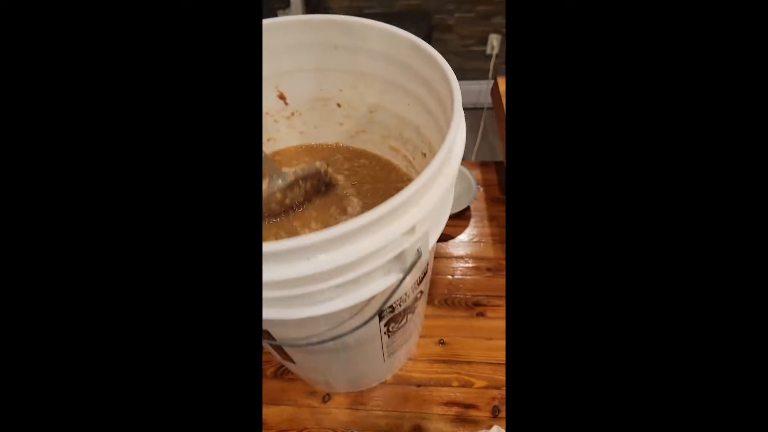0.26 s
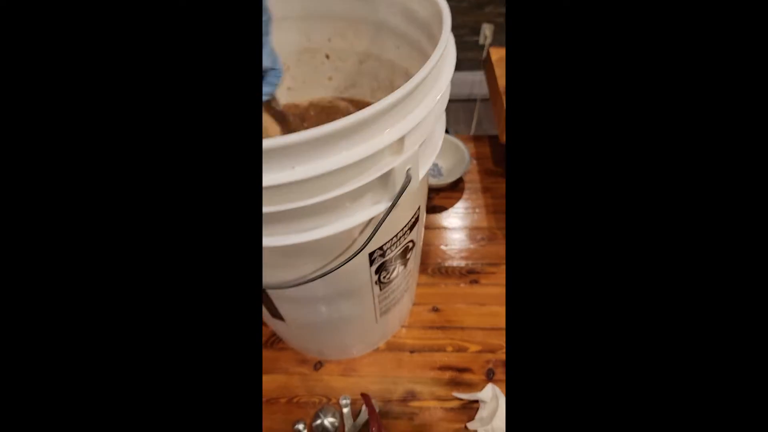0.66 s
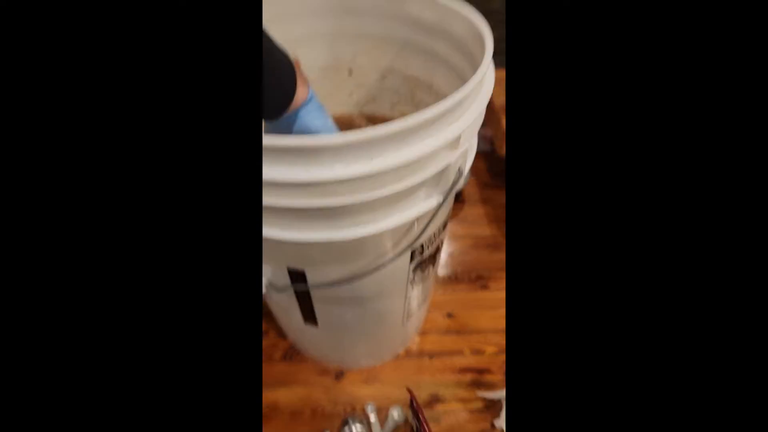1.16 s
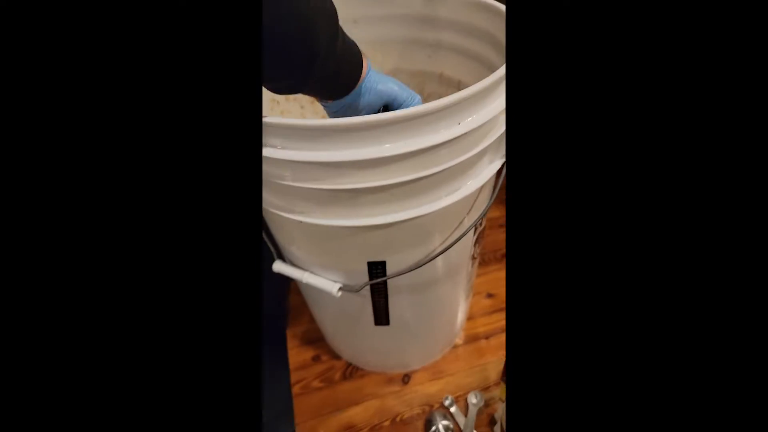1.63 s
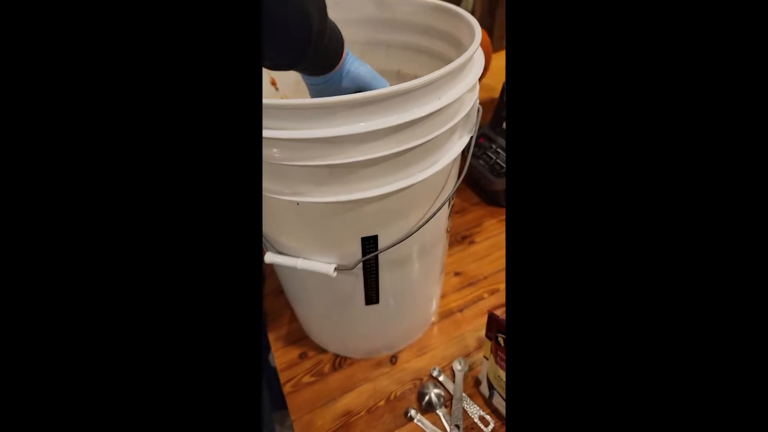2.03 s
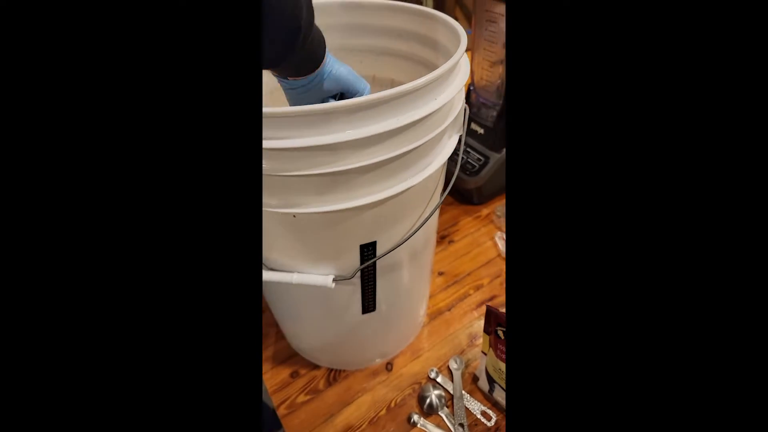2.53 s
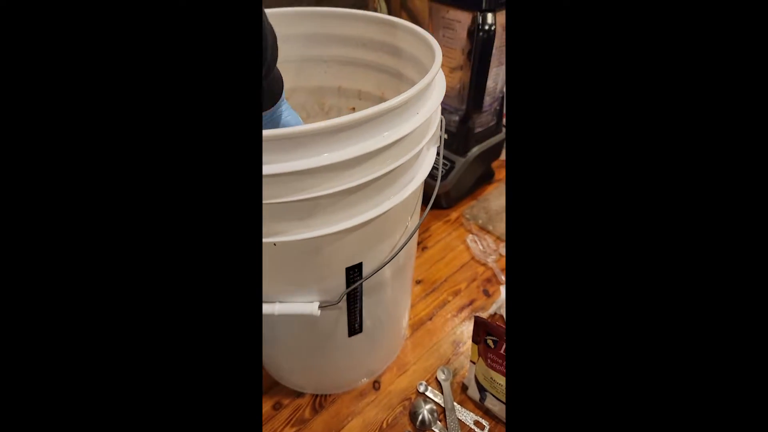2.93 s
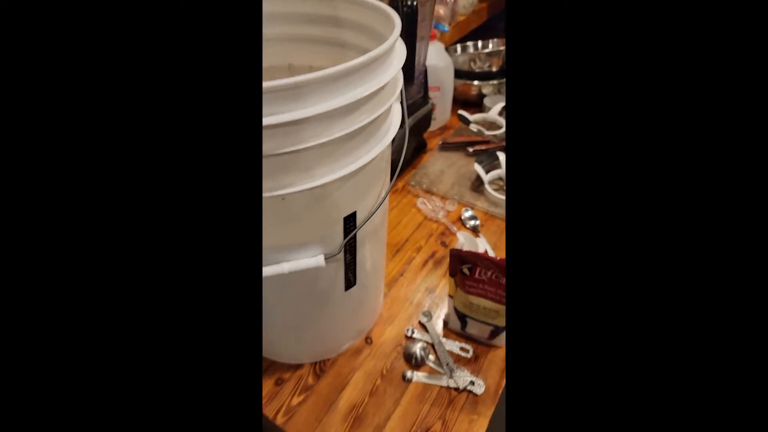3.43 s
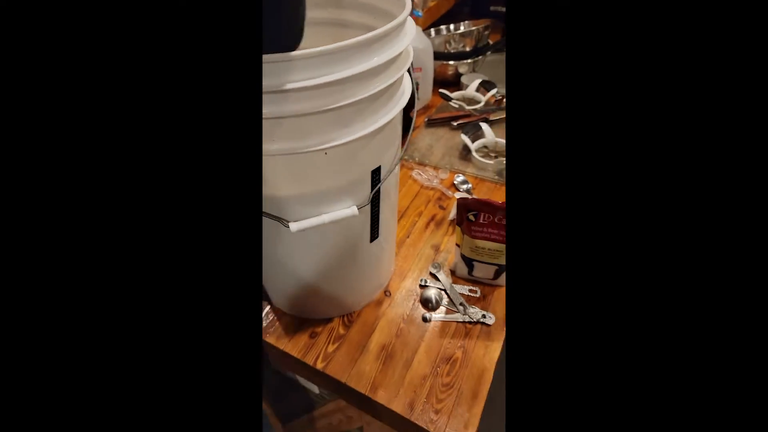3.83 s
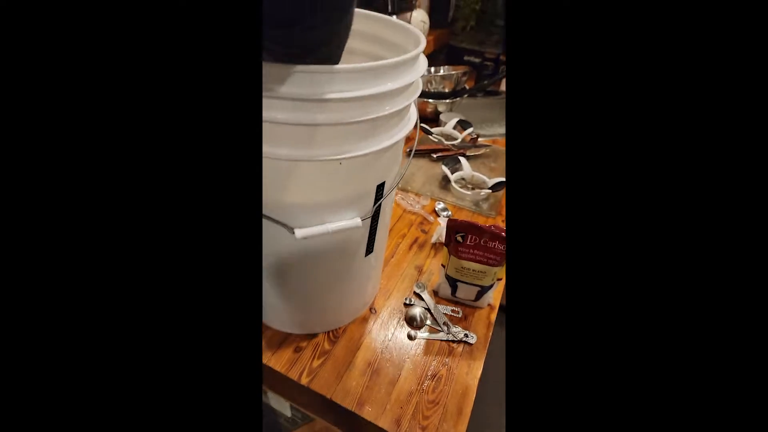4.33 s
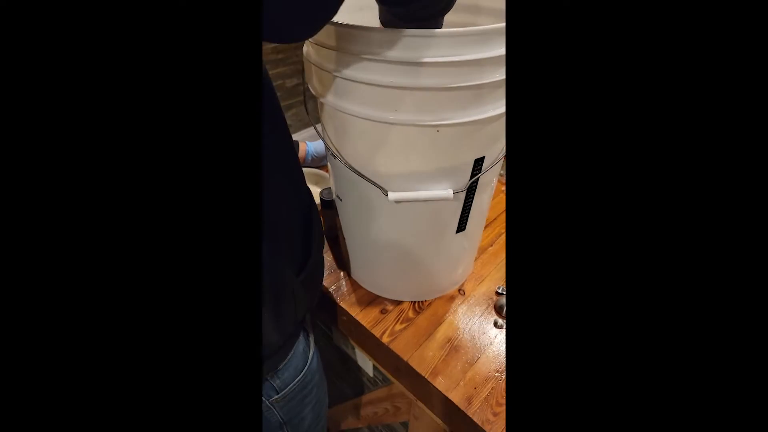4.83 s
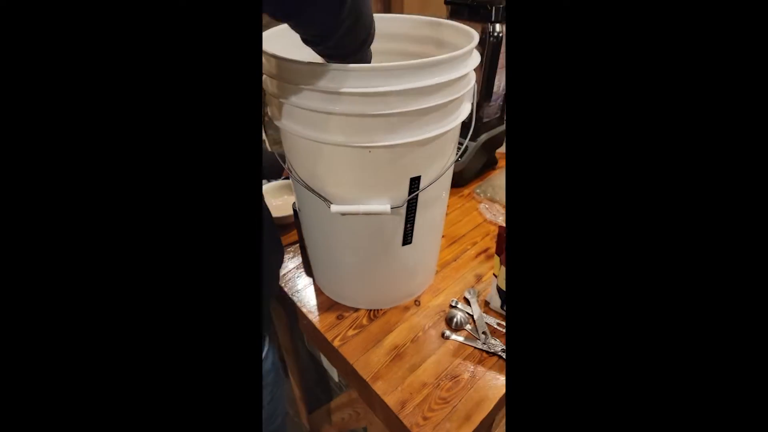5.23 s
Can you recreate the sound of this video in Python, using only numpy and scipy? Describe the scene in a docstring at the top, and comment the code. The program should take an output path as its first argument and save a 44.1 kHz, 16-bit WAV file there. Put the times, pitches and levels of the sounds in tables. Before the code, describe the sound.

Close, wide stereo sound of stirring in a large plastic bucket on a wooden kitchen table, with short room reflections and a faint constant hiss. From 0 to 0.6 s there are only very weak spoon taps and tiny hollow plops; a small knock and slap come at 0.65 s. From about 0.9 s the liquid begins to swell and gurgle, with a plop and splash at 1.1 s. The hardest hollow knock lands at 1.5 s, followed by a burst of slaps and scattered drops. A short easing, then strong knocks at 2.15 and 2.85 s, where a low thud starts the table rumbling. Between 3.1 and 3.7 s knocks crowd together with a big wet slap at 3.4 s. Softer knocks and short hollow tones follow around 4 s, then more sloshing, knocks near 4.8 and 5.15 s with low thuds at 4.85 and 5.3 s, still stirring at the end, 5.5 s.

```python
"""A kitchen, two microphones close to a plastic bucket on a wooden table; a faint hiss runs throughout.
It opens with weak spoon knocks, as struck modes, and short hollow tones, as decaying sines that rise a little.
From about 0.9 s waves swell: clicks through filters and resonators gurgle, slosh, slap the wall and spray.
The hardest knock comes at 1.5 s; knocks then go on unevenly, nearly five a second over the whole take.
From 2.9 s the table rumbles more readily, as filtered noise, until the stirring stops with the end at 5.5 s."""
import sys
import numpy as np
from scipy import signal
from scipy.fft import rfft, irfft, next_fast_len
from scipy.io import wavfile
from scipy.ndimage import uniform_filter1d

SR = 44100
rng = np.random.default_rng(int(sys.argv[2]) if len(sys.argv) > 2 else 0)


def store_pcm(level_fs):
    """Save levels as 16-bit WAV."""
    pcm = np.round(np.clip(level_fs, -1, 1) * 32767).astype(np.int16)
    wavfile.write(sys.argv[1], SR, np.atleast_2d(pcm).T)


N = 241263


def from_db(db):
    """Turn decibels into an amplitude factor."""
    return 10 ** (np.asarray(db) / 20)


def rms_one(x, count=None):
    """Scale to rms 1, taken over the first count samples."""
    return x / np.sqrt(np.mean(x[..., :count] ** 2) + 1e-20)


def at_hz(points, hz):
    """Read a table on a log-frequency axis."""
    f, value = np.transpose(points)
    return np.interp(np.log(np.maximum(hz, 1)), np.log(f), value)


def add(track, s, sound):
    """Mix a sound into the track at a time; one due before the start begins at the start."""
    i = max(0, round(s * SR))
    track[i:i + len(sound)] += sound[:max(0, N - i)]


def band(x, low, high):
    """Band-pass with fairly steep edges."""
    edges = [low, min(high, 0.45 * SR)]
    return signal.sosfilt(signal.butter(3, edges, "band", fs=SR, output="sos"), x)


def colour(x, spectrum):
    """Causal (minimum-phase) filter of unit power with the given spectrum, falling steeply past its ends."""
    size = 8192
    hz = np.maximum(np.arange(size // 2 + 1) * SR / size, 1)
    octaves_outside = np.abs(np.log2(hz / np.clip(hz, spectrum[0][0], spectrum[-1][0])))
    response_db = at_hz(spectrum, hz) - np.minimum(24 * octaves_outside, 50)
    cepstrum = irfft(np.log(rms_one(from_db(response_db))))
    # folding the cepstrum forward makes the filter causal
    cepstrum[1:size // 2] *= 2
    cepstrum[size // 2 + 1:] = 0
    return signal.oaconvolve(x, irfft(np.exp(rfft(cepstrum))))[:len(x)]


def drift(rate):
    """Smooth chance: normal values, rate of them a second, joined by straight lines."""
    knots = rng.standard_normal(int(N / SR * rate) + 2)
    return np.interp(np.arange(N) / SR * rate, np.arange(len(knots)), knots)


def ring(force, hz, t60):
    """A damped resonator: a unit click sets a sine of height 1 ringing."""
    r, w = from_db(-60 / (t60 * SR)), 2 * np.pi * hz / SR
    return signal.lfilter([0, np.sin(w)], [1, -2 * r * np.cos(w), r * r], force + 1e-18)


def grains(count, per_s, spread_db):
    """Random clicks of uneven size and either sign; rms 1."""
    clicks, number = np.zeros(count), max(1, int(per_s * count / SR))
    place, size, sign = np.random.default_rng(rng.integers(2 ** 31)).random((number, 3)).T
    height = from_db(spread_db * np.minimum(-np.log(1 - size), 4))
    clicks[(place * count).astype(int)] = np.sign(sign - 0.5) * height
    return rms_one(clicks)


def rising_tone(hz, cycles, rise):
    """A sine that dies by 60 dB over some cycles while its pitch rises by the given share."""
    age = np.arange(int(cycles / hz * SR)) / (cycles / hz * SR)
    tone = np.sin(2 * np.pi * cycles * (age + rise * age ** 2 / 2))
    return tone * from_db(-60 * age) * (1 - np.exp(-age * cycles))


# spectrum of the kitchen's hiss at the microphones: (frequency [Hz], relative level [dB])
HISS_SPECTRUM = [(25, 3), (60, 2), (110, -9.5), (200, -13.5), (345, 3), (480, -7), (620, -7.5), (780, -5.5),
                 (1100, -13), (1600, -12.5), (2150, -6.5), (2800, -16), (3600, -13.5), (4500, -10.5),
                 (5600, -17.5), (7200, -15), (9500, -29.5), (13000, -24), (16000, -24)]


def background(hiss_db=-64):
    """The steady faint hiss of the kitchen, as coloured noise."""
    return from_db(hiss_db) * colour(rng.standard_normal(N), HISS_SPECTRUM)


# spoon knocks on the bucket wall: (time [s], strength [dB], hollow ring of that spot [dB],
# brightness [dB], hardness of the contact [dB])
KNOCKS = [(0.001, -65.5, 16.5, 13, 13), (0.204, -62.5, 4, 15, 12), (0.648, -48.5, 1, -5, 12),
          (1.096, -36.5, 2.5, -7, -5), (1.179, -43, 6, -3, -2), (1.222, -39, 1.5, 2, -5),
          (1.538, -18.5, 1, 1, 0), (1.809, -40, -6.5, 4.5, -10), (1.884, -46, 6, -1, 4),
          (2.142, -22.5, -3.5, 3, 2), (2.342, -31, 0, 4, -3), (2.665, -35.5, 3, 7, 0),
          (2.858, -26.5, 0, 2, 1), (3.132, -21, 2.5, 3, 4), (3.319, -22, -4, -3.5, 15.5),
          (3.401, -24, -5.5, -1, -8), (3.647, -25, 0, -6.5, 7.5), (3.823, -34.5, -3, -7, 19),
          (3.949, -34.5, -5, 9, -14.5), (4.08, -42, -10, -7, -10), (4.243, -28, -4, -15, 1),
          (4.42, -37, -6.5, 3.5, -2), (4.524, -36.5, -6, -6, -5), (4.817, -24, -1, -6.5, 2),
          (5.139, -29.5, 1.5, -15, 3), (5.45, -27.5, -6, -2, 0)]
# spectrum of sloshing liquid: (frequency [Hz], relative level [dB])
SLOSH_SPECTRUM = [(550, -14), (800, 3.5), (1050, 2.5), (1400, 7), (1800, -2), (2150, -3.5), (2700, -9),
                  (4000, -22), (6000, -32)]


def grazes(level_db=-15.5, lead_s=0.0059):
    """The spoon squeezes the liquid against the wall: a hiss growing up to each knock."""
    out, t = np.zeros(N), np.arange(-SR // 30, 0) / SR
    for s, strength_db, *_ in KNOCKS:
        swell = rng.standard_normal(len(t)) * np.exp(t / lead_s)
        add(out, s + t[0], from_db(strength_db + level_db) * swell)
    return colour(out, SLOSH_SPECTRUM)


# wall and air-column modes of the bucket: (frequency [Hz], relative level [dB], t60 [s])
BUCKET_MODES = [(192, -14.5, 0.091), (268.5, -3, 0.17), (300.6, -7.5, 0.15), (330.5, -1, 0.18),
                (360.6, -0.5, 0.16), (393, -3, 0.093), (456.5, -11.5, 0.27), (742.7, 0.5, 0.16),
                (786.2, 1.5, 0.19), (867, -5, 0.3), (930.5, -2.5, 0.16), (1261, -3, 0.068),
                (1354.4, 0.5, 0.05), (1434, -6.5, 0.2), (1510, -27, 0.042), (2060, 9.5, 0.18),
                (2240, -15, .09), (2877, -4, 0.23), (3566, -0.5, 0.028), (3960, -33.5, 0.07)]
# the four registers of a knock: (low edge [Hz], high edge [Hz], level [dB], build-up [s],
# dense ring t60 [s], dense ring level [dB], crack level [dB], crack length [s])
REGISTERS = [(139.5, 585, 1, 0.0052, 0.23, -6, -1, 0.024), (530, 1347, 0, 0.0018, 0.15, -8, 9, 0.011),
             (1097, 1696, -1, 0.0011, 0.24, -1, 9.5, 0.0022),
             (1760, 4370, -8.5, 0.00072, 0.15, -5, 11, 0.00074)]
# what a knock gives each register: (level [dB], hollow ring [share], brightness [share], hardness [share])
VOICING = [(0.0, 0.032, 0.0, 0.0), (-0.5, 0.96, 0.029, 0.0), (-3, 0, 0.5, 0.26), (-9.0, 0.29, 0.91, 0.0)]


def knocks(chatter_db=-25.0, chatter_s=0.0098, uneven_db=3.0, push_db=0.0, push_hz=394.0):
    """The spoon cracks on the wall and chatters; each spot favours other modes, over a dense plastic ring."""
    out, t = np.zeros(N), np.arange(SR // 3) / SR
    for s, strength_db, hollow_db, bright_db, hard_db in KNOCKS:
        chatter = grains(len(t), per_s=680, spread_db=1.5) * np.exp(-t / chatter_s)
        force = from_db(chatter_db) * chatter
        force[0] += 1
        levels_db = strength_db + np.array(VOICING) @ [1, hollow_db, bright_db, hard_db]
        for level_db, register in zip(levels_db, REGISTERS):
            low, high, trim_db, build_s, t60, dense_db, crack_db, crack_s = register
            modes = np.zeros(len(t))
            for hz, db, decay in BUCKET_MODES:
                if low <= hz < high:
                    height = from_db(db + uneven_db * rng.normal()) * rng.choice([-1, 1])
                    modes += height * ring(force, hz * (1 + 0.0055 * rng.normal()), decay)
            dense = band(rng.standard_normal(len(t)) * from_db(-60 * t / t60), low, high)
            tone = rms_one(modes, count=1500) + from_db(dense_db) * rms_one(dense, count=1500)
            # the first swings are the largest, before the liquid damps the wall
            crack = 1 + from_db(hard_db + crack_db) * np.exp(-t / crack_s)
            attack = (1 - np.exp(-t / build_s)) * crack
            add(out, s, from_db(level_db + trim_db) * rms_one(tone * attack, count=1500))
        # the whole wall gives way with one short push
        push = np.sin(2 * np.pi * push_hz * t) * (1 - np.exp(-t / 0.00051)) * np.exp(-t / 0.0031)
        add(out, s, from_db(strength_db + push_db) * push)
    return out


# waves raised by the spoon: (crest time [s], swell [s], slosh [dB], gurgle [dB], foam [dB])
WAVES = [(0.905, 0.04, -58.5, -58.5, -69), (1.24, 0.1, -50, -49, -67), (1.624, 0.082, -45, -38, -62),
         (1.93, 0.083, -54, -66.5, -67), (2.22, 0.067, -41, -49, -67), (2.421, 0.097, -41, -42.5, -72),
         (2.74, 0.066, -39.5, -42.5, -88), (2.975, 0.056, -47.5, -48, -60),
         (3.471, 0.07, -39.5, -41.5, -68.5), (3.78, 0.12, -46, -42.5, -95), (3.998, 0.087, -39.5, -49, -63),
         (4.098, 0.06, -52, -50.5, -57.5), (4.571, 0.065, -42, -39.5, -63.5),
         (4.674, 0.051, -49, -42.5, -56), (5.23, 0.056, -38.5, -42.5, -66)]
EBB_SHARE = 0.48  # time constant of a wave's ebb, as a share of its swell
SPRAY_FROM_FOAM = 0.57  # the spray's dB level lies this far from the slosh's towards the foam's
RIPPLE_DB = -77.0  # slosh and spray never come quite to rest


def waves():
    """Each wave swells, breaks and ebbs away: the strength of gurgle, slosh, spray and foam over time."""
    out, t = np.zeros((4, N)), np.arange(-SR // 5, SR // 2) / SR
    out[1:3] = from_db(RIPPLE_DB)
    for s, swell_s, slosh_db, gurgle_db, foam_db in WAVES:
        swell = np.exp(-(t / swell_s) ** 2)
        ebb = np.exp(1 - np.hypot(1, t / (EBB_SHARE * swell_s)))
        shape = np.where(t < 0, swell, ebb)
        spray_db = slosh_db + SPRAY_FROM_FOAM * (foam_db - slosh_db)
        for track, db in zip(out, (gurgle_db, slosh_db, spray_db, foam_db)):
            add(track, s + t[0], from_db(db) * shape)
    return out


# spectrum of the table's rumble: (frequency [Hz], relative level [dB])
RUMBLE_SPECTRUM = [(20, -29.5), (32, -24), (45, -11.5), (66, 3), (85, -6.5), (115, -9), (150, -19.5),
                   (220, -17.5)]
# how readily the bucket rocks on the table: (time [s], rumble against the blow [dB])
LOOSENESS = [(0.0, -29), (1.6, -18), (2.2, -16), (2.65, -22), (2.87, -2), (3.15, -10), (4.25, -11),
             (4.6, -7), (5.47, -9.5)]
# the bucket's base settles back on the table: (time [s], level [dB])
THUDS = [(0.17, -61.5), (1.23, -54), (2.88, -37.5), (4.859, -39.5), (5.305, -44.5)]
ROCK_RISE_S, ROCK_DECAY_S = 0.048, 0.064


def table(knock_db=0.0, wave_db=0.0, thud_s=0.0092):
    """Knocks and the weight of waves rock the bucket, which shakes the table top and at times thuds back."""
    rocking, t = from_db(wave_db) * waves()[0], np.arange(SR) / SR
    rock = (1 - np.exp(-t / ROCK_RISE_S)) * np.exp(-t / ROCK_DECAY_S)
    for s, strength_db, *_ in KNOCKS:
        add(rocking, s, from_db(strength_db + knock_db) * rock)
    rocking *= from_db(np.interp(np.arange(N) / SR, *np.transpose(LOOSENESS)))
    for s, db in THUDS:
        add(rocking, s, from_db(db) * t / thud_s * np.exp(1 - t / thud_s))
    rumble = colour(rng.standard_normal(N), RUMBLE_SPECTRUM)
    # evened out, so that the rocking alone sets the level
    return rocking * rumble / np.sqrt(uniform_filter1d(rumble ** 2, size=4000) + 1e-20)


# short hollow ringing tones: plopping bubbles, and near 1.4 kHz the struck bucket:
# (time [s], relative level [dB], starting pitch [Hz])
HOLLOW_TONES = [(0.002, -39, 817), (0.206, -34.5, 1156), (0.219, -39, 1010), (0.754, -48, 835),
                (1.104, -17.5, 809), (1.182, -27.5, 840), (2.397, -23, 900), (3.821, -21.5, 1420),
                (4.418, -19, 1360), (5.268, -26.5, 916)]


def hollow_tones(level_db=1.0, cycles=51.0, octave_db=-1.5):
    """Plopping bubbles, and near 1.4 kHz the struck bucket, as decaying sines; a tilt softens high pitches."""
    out = np.zeros(N)
    for s, db, hz in HOLLOW_TONES:
        tone_db = db + level_db + octave_db * np.log2(hz / 900)
        add(out, s, from_db(tone_db) * rising_tone(hz, cycles, rise=0.026))
    return out


def bubbling(low_hz, high_hz, cycles, per_s, count):
    """A swarm of small bubbles: clicks ring resonators spread over a range of pitches; rms 1."""
    swarm = np.zeros(N)
    for hz in np.geomspace(low_hz, high_hz, count):
        clicks = grains(N, per_s / count, spread_db=7.0)
        swarm += rms_one(ring(clicks, hz * rng.uniform(0.81, 1.04), cycles / hz))
    return rms_one(swarm)


# spectra of gurgles, fine spray and fizzing foam: (frequency [Hz], relative level [dB])
GURGLE_SPECTRUM = [(90, -26.5), (180, -7), (280, -4.5), (360, -1.5), (480, -10), (620, -8), (790, -5),
                   (950, -32.5)]
SPRAY_SPECTRUM = [(2000, -9.5), (3200, -4), (5300, -4), (7000, -3.5), (8000, -14), (10000, -15)]
FOAM_SPECTRUM = [(6000, -5), (8700, 5.5), (10500, -1.5), (12700, -1), (16000, -3)]


def liquid(gurgle_db=-1.5, slosh_db=0.0, spray_db=-2.5, foam_db=-0.5, wash_db=4.0, flutter_db=2.0):
    """Deep gurgles in the bucket's air column, sloshing bubbles, fine spray and fizzing foam."""
    deep, slosh, spray, foam = waves()
    gurgles = colour(grains(N, per_s=550, spread_db=7.0), GURGLE_SPECTRUM)
    swarm = rms_one(colour(bubbling(689, 3740, cycles=59, per_s=460, count=22), SLOSH_SPECTRUM))
    wash = from_db(wash_db) * colour(grains(N, per_s=2500, spread_db=5), SLOSH_SPECTRUM)
    fine_bubbles = bubbling(3000, 8000, cycles=70, per_s=990, count=12)
    mist = 0.5 * fine_bubbles + grains(N, per_s=4000, spread_db=2.5)
    fizz = colour(grains(N, per_s=22000, spread_db=6.5), FOAM_SPECTRUM)
    surface = slosh * from_db(slosh_db) * rms_one(swarm + wash)
    surface += spray * from_db(spray_db) * rms_one(colour(mist, SPRAY_SPECTRUM))
    surface += foam * from_db(foam_db) * fizz
    flutter = from_db(flutter_db * (drift(100) + drift(30)))
    return deep * from_db(gurgle_db) * gurgles + flutter * surface


def droplets(level_db=-3.0, cycles=35.0):
    """Single drops fall back from the waves, each with a short rising blip as strong as the slosh allows."""
    out, slosh = np.zeros(N), waves()[1]
    for when, pitch, strength in rng.random((500, 3)):
        i = int(when * N)
        blip = rising_tone(1100 * 5 ** pitch, cycles, rise=0.15)
        add(out, i / SR, slosh[i] * from_db(level_db + 12 * strength - 12 * pitch) * blip)
    return out


# flung drops tick on the plastic: (time [s], relative level [dB])
TICKS = [(0.6955, -47), (0.7425, -50), (1.7203, -34), (2.085, -45.5), (2.669, -40), (3.2172, -46),
         (3.4013, -31), (3.7932, -30.5), (3.9411, -30.5), (4.3873, -43.5), (4.7024, -34)]
# stray ones come at random
STRAY_TICKS_PER_S, STRAY_TICK_DB, STRAY_SPREAD_DB = 18, -57.5, 4
WETTING_S, DRY_WALL_DB = 1.6, -9.0  # the stray ones are weaker until the stirring has wetted the wall


def ticks(decay_s=0.0006, wall_db=0.5, spray_db=-3.5, foam_db=-5.0):
    """A drop hits the wall with a short bright click of decaying noise."""
    out, t = np.zeros(N), np.arange(SR // 100) / SR
    count = int(STRAY_TICKS_PER_S * N / SR)
    chance = np.random.default_rng(rng.integers(2 ** 31)).random((count, 2))
    stray = []
    for s, size in chance * [N / SR, 1]:
        size_db = STRAY_SPREAD_DB * min(-np.log(1 - size), 3)
        dry_db = DRY_WALL_DB * max(0, 1 - s / WETTING_S)
        stray.append((s, STRAY_TICK_DB + size_db + dry_db))
    for s, db in TICKS + stray:
        add(out, s, from_db(db) * rng.standard_normal(len(t)) * np.exp(-t / decay_s))
    wall = from_db(wall_db) * colour(out, SLOSH_SPECTRUM)
    spray = from_db(spray_db) * colour(out, SPRAY_SPECTRUM)
    return wall + spray + from_db(foam_db) * colour(out, FOAM_SPECTRUM)


# the main slaps of liquid on the wall: (time [s], level [dB], spray against that level [dB], t60 [s])
SLAPS = [(0.6494, -39, -11.5, 0.044), (1.0934, -30, -2.5, 0.03), (1.5614, -23.5, -4.5, 0.14),
         (1.5975, -29.5, -8.5, 0.08), (1.6374, -33, -9, 0.06), (1.6596, -30, -21.5, 0.1),
         (1.7197, -34, -12, 0.067), (2.1674, -28, -13.5, 0.18), (2.1984, -29.5, -10, 0.054),
         (2.2667, -36.5, -17.5, 0.14), (2.3714, -30, -14, 0.062), (2.394, -33, -11.5, 0.18),
         (2.703, -33, -17.5, 0.072), (2.8634, -28.5, -7.5, 0.26), (3.151, -27.5, -26.5, 0.084),
         (3.4241, -22.5, -15.5, 0.26), (3.4705, -28.5, -10.5, 0.067), (4.5421, -30, -10.5, 0.16),
         (4.588, -29, -11.5, 0.027), (5.1374, -32.5, -8, 0.11), (5.1654, -28, -28, 0.14),
         (5.2676, -31.5, -25.5, 0.07), (5.462, -30, -12.5, 0.09)]
# small slaps, their level set against the slosh of the moment
SMALL_SLAPS_PER_S, SMALL_SLAP_DB, SMALL_SLAP_SPRAY_DB, SMALL_SLAP_T60_S = 22, -5, -22, 0.036


def splashes(spread_db=4.5):
    """Every splash: the main slaps, and small random ones that follow the strength of the wave under them."""
    slosh = waves()[1]
    count = int(SMALL_SLAPS_PER_S * N / SR)
    chance = np.random.default_rng(rng.integers(2 ** 31)).random((count, 2))
    small = []
    for when, size in chance:
        wave_db = 20 * np.log10(slosh[int(when * N)])
        level_db = wave_db + SMALL_SLAP_DB + spread_db * (size - 0.5)
        small.append((when * N / SR, level_db, SMALL_SLAP_SPRAY_DB, SMALL_SLAP_T60_S))
    return SLAPS + small


# thin ring of the steel spoon: (frequency [Hz], relative level [dB], t60 [s])
SPOON_MODES = [(2130, 6.5, 0.27), (2920, -7, .25), (3570, 0.5, 0.11), (4250, -5.5, 0.25), (5300, -13, .12),
               (5620, 0, 0.066), (5840, -6.5, .1), (6700, -11.5, 0.14), (7460, -7.5, 0.098),
               (12586, -14, .08)]


def slaps(body_db=-3.0, spray_db=-8.0, snap_db=-7.5, snap_s=0.00097, spoon_db=-3.5, clump_db=4.0):
    """A wave hits the wall: a snap, then clumps of tiny collapses that also set the spoon ringing."""
    body, spray, snaps = np.zeros((3, N))
    t = np.arange(SR // 5) / SR
    for s, level_db, wet_db, t60 in splashes():
        knots_s = t[::200]
        clumps = from_db(clump_db * np.interp(t, knots_s, rng.standard_normal(len(knots_s))))
        fade = clumps * from_db(-60 * t / max(t60, 0.005))
        for track, db in ((body, level_db + body_db), (spray, level_db + wet_db + spray_db)):
            collapses = grains(len(t), per_s=5000, spread_db=4) * fade
            add(track, s, from_db(db) * rms_one(collapses, count=900))
        snap = rng.standard_normal(len(t)) * np.exp(-t / snap_s)
        add(snaps, s, from_db(level_db + wet_db / 2 + snap_db) * snap)
    bright = spray + snaps
    force = bright + 0.12 * body
    spoon = sum(from_db(db) * rms_one(ring(force, hz, t60)) for hz, db, t60 in SPOON_MODES)
    spoon = from_db(spoon_db) * np.std(bright) * rms_one(spoon)
    wet = colour(bright, SPRAY_SPECTRUM) + 0.55 * colour(bright, FOAM_SPECTRUM)
    return colour(body, SLOSH_SPECTRUM) + spoon + wet


def spatter(level_db=-3.5, flight_s=0.05, spread_db=12.0, treble_db=-17.0,
            cycles=24.0, low_hz=1192.0, octaves=2.42, count=12):
    """Each main slap throws a handful of drops that land one by one; high and late blips tend to be softer."""
    out = np.zeros(N)
    for s, slap_db, *_ in SLAPS:
        for when, pitch, strength in rng.random((count, 3)):
            db = slap_db + level_db + treble_db * pitch + spread_db * (strength - when)
            blip = rising_tone(low_hz * 2 ** (octaves * pitch), cycles, rise=0.1)
            add(out, s + 2 * flight_s * when, from_db(db) * blip)  # flight_s is the mean flight
    return out


def echoes(x, t60, delay_s, top_hz):
    """Dense reflections that fade in after a delay, near unit gain below 2.2 kHz; the treble dies sooner."""
    t = np.arange(int(0.6 * SR)) / SR
    white = rng.standard_normal(len(t))
    dull = signal.sosfilt(signal.butter(2, min(top_hz, 16000), fs=SR, output="sos"), white)
    treble = 0.5 * (white - dull)
    tail = dull * from_db(-60 * t / t60) + treble * from_db(-90 * t / t60)
    tail *= np.clip(t / delay_s - 1, 0, 1)
    power = np.mean(np.abs(rfft(tail)[:len(t) // 20]) ** 2)
    return signal.fftconvolve(x, tail / np.sqrt(power))[:N]


def stirring(room_db=-10.0):
    """What the bucket sends out in one direction, with the kitchen's answer and hiss."""
    struck = grazes() + knocks() + table() + hollow_tones()
    bucket = struck + liquid() + droplets() + ticks() + slaps() + spatter()
    room = echoes(bucket, t60=0.29, delay_s=0.013, top_hz=5700)
    return background() + bucket + from_db(room_db) * room


# phase by which the right microphone lags: (frequency [Hz], lag [radians])
LAG = [(40, 0.5), (130, 0.17), (250, 0.15), (340, 1.7), (480, 2), (750, 2), (1400, 3), (2000, 3.5),
       (3000, 7), (6000, 8), (16000, 8)]
# the part that differs between the microphones: (frequency [Hz], level [dB])
SPREAD = [(60, -30.5), (180, -6), (330, -11.5), (800, -7.5), (1400, -7), (2500, 1.5), (5000, -1.5),
          (15000, 1.5)]
# lean of the pair: (frequency [Hz], left minus right [dB])
BALANCE = [(60, -2.5), (250, -3), (340, -3.5), (500, 0), (800, -3), (1400, -1), (2200, -3), (4500, -3),
           (8000, -3.5), (15000, 0)]


def microphones(shared, differing):
    """The two microphones hear the common sound out of step; another part reaches them in opposite sign."""
    size = 2 * next_fast_len(N // 2 + 4096)
    hz = np.arange(size // 2 + 1) * SR / size
    both = rfft(shared, size)
    own = rfft(differing, size) * from_db(at_hz(SPREAD, hz))
    lean = from_db(at_hz(BALANCE, hz) / 2)
    left = (both + own) * lean
    right = (both - own) / lean * np.exp(-1j * at_hz(LAG, hz))
    return irfft(np.array([left, right]))[:, :N]


def scene():
    """Wall and liquid radiate a different mix of modes and bubbles in each direction."""
    return microphones(stirring(), stirring())


def record(dry):
    """The highest peaks are rounded and the top is cut, 70 dB down from 16.9 kHz."""
    top_cut = signal.cheby2(16, 70, 16900, fs=SR, output="sos")
    return signal.sosfilt(top_cut, np.tanh(dry))


dry = scene()
out = record(dry)
store_pcm(out)
```